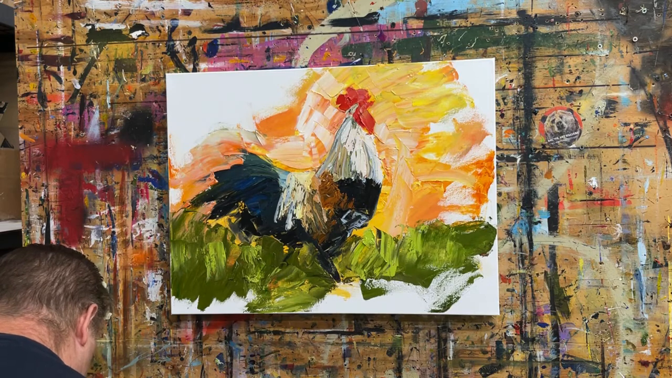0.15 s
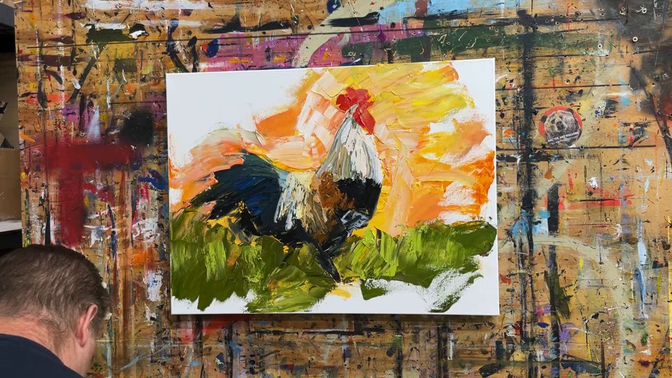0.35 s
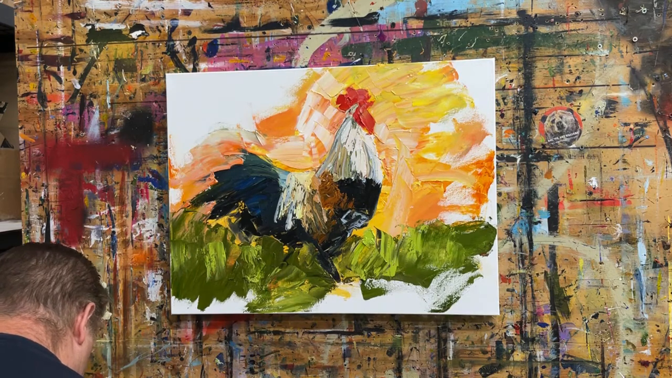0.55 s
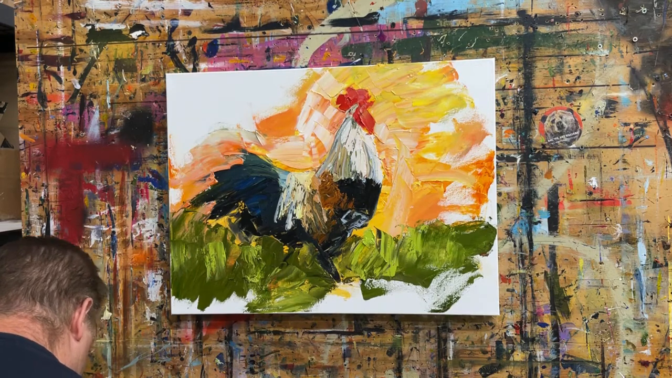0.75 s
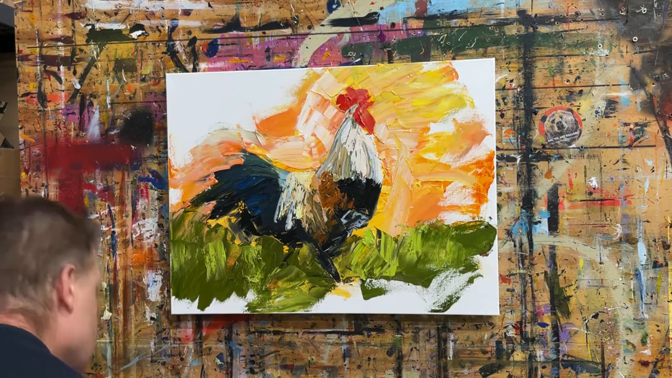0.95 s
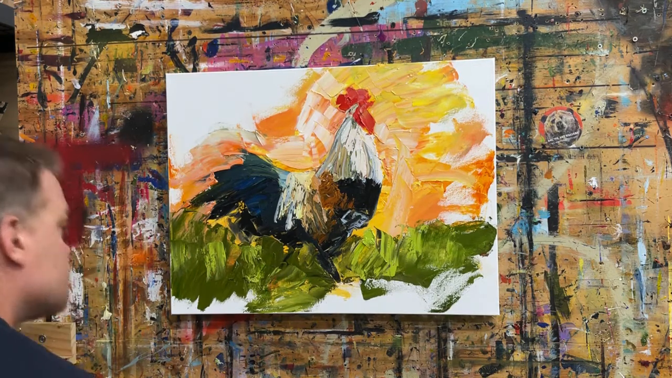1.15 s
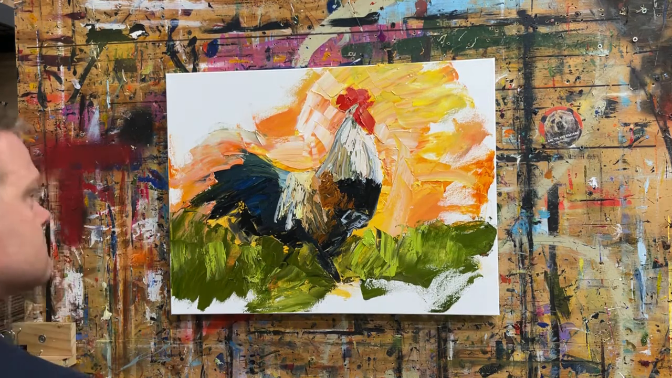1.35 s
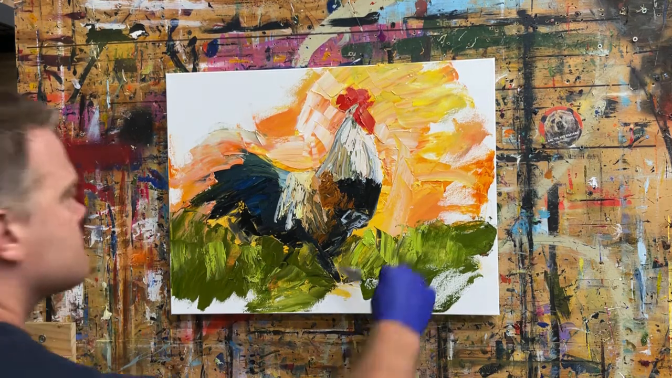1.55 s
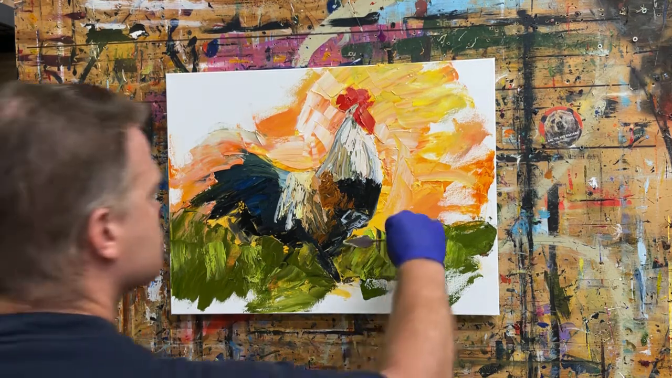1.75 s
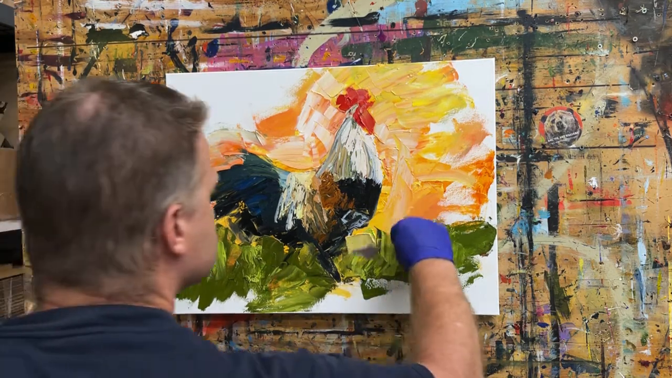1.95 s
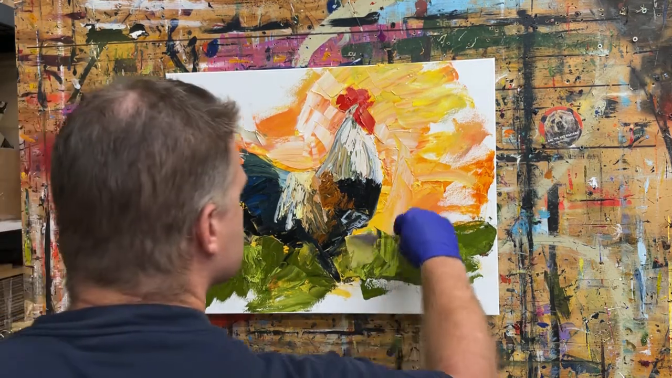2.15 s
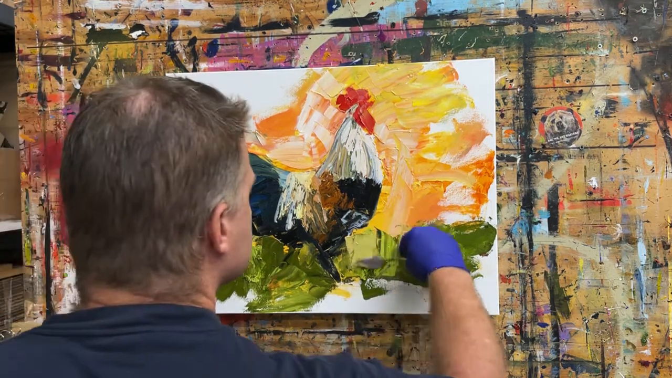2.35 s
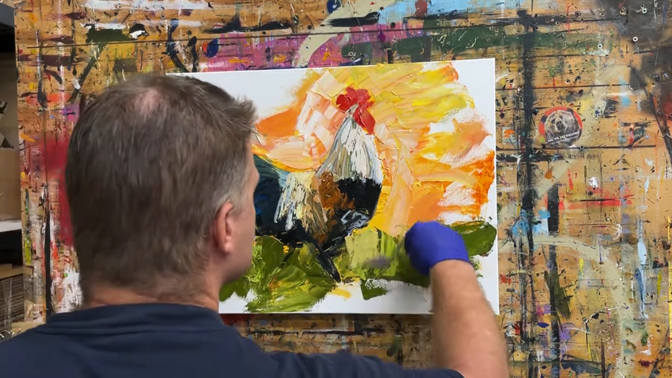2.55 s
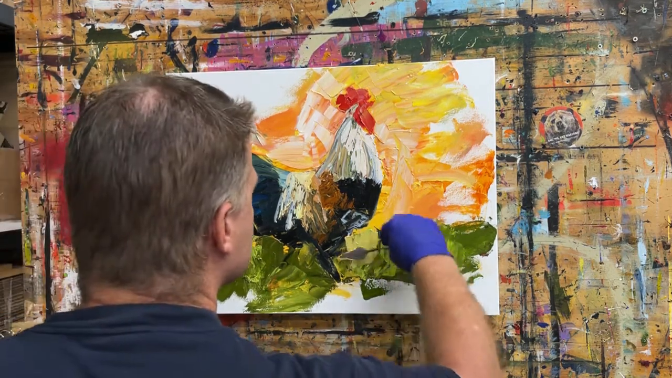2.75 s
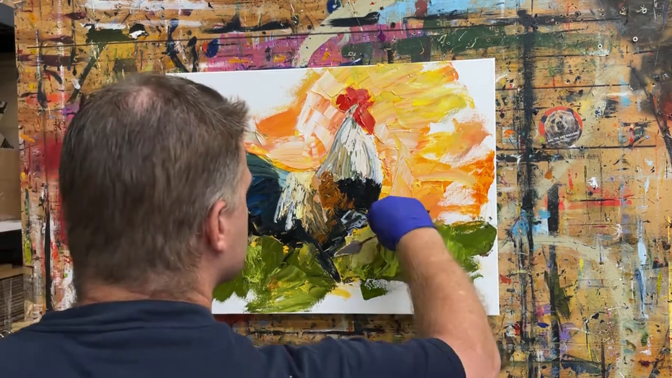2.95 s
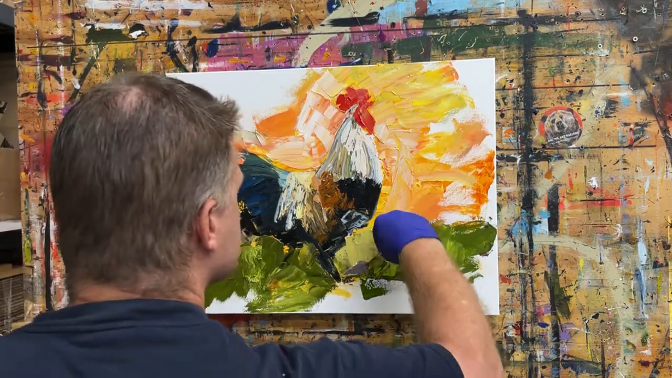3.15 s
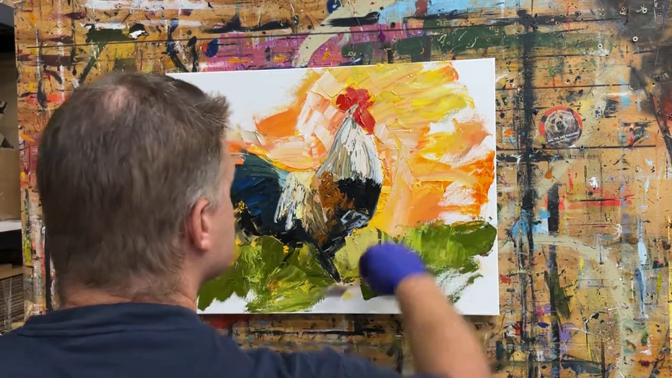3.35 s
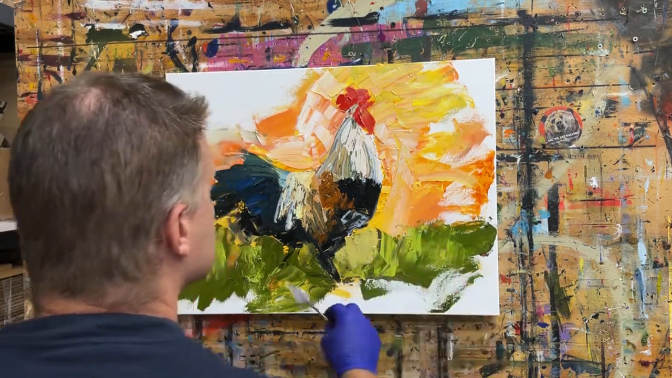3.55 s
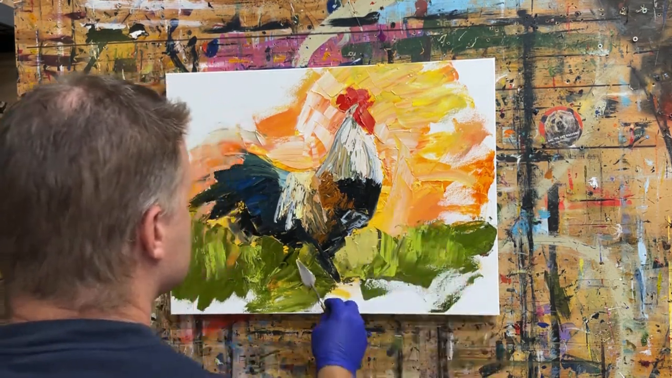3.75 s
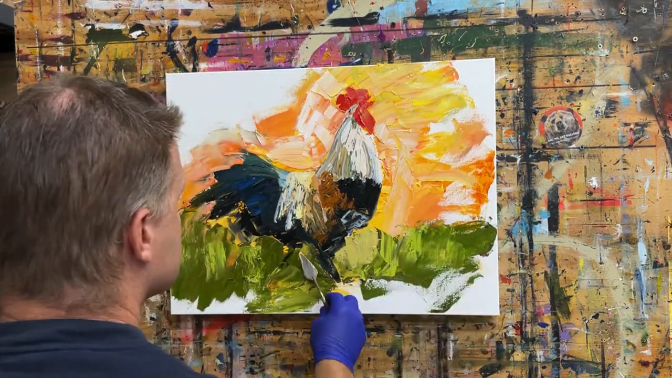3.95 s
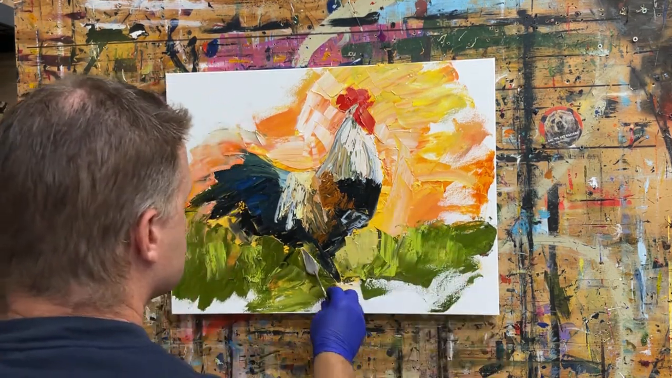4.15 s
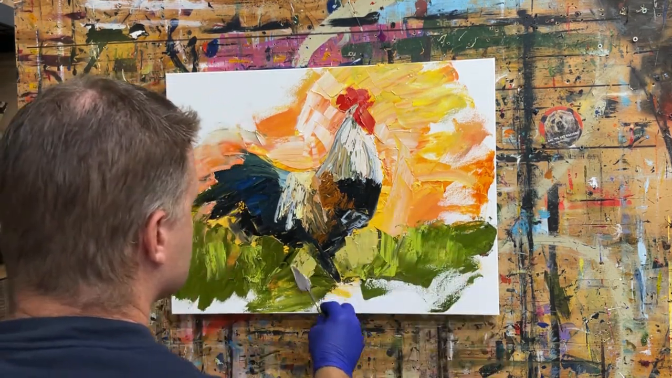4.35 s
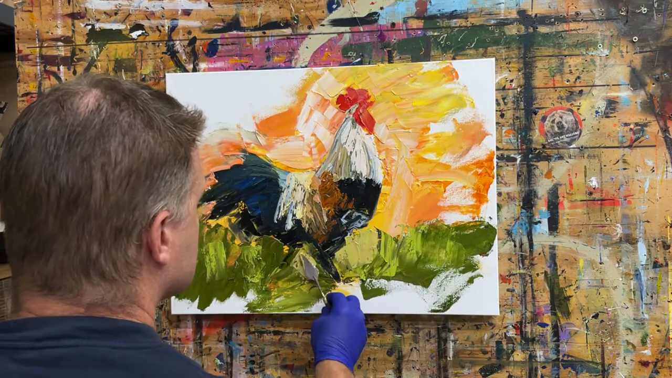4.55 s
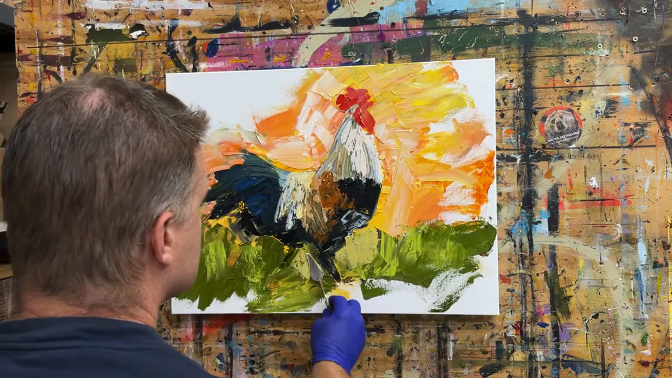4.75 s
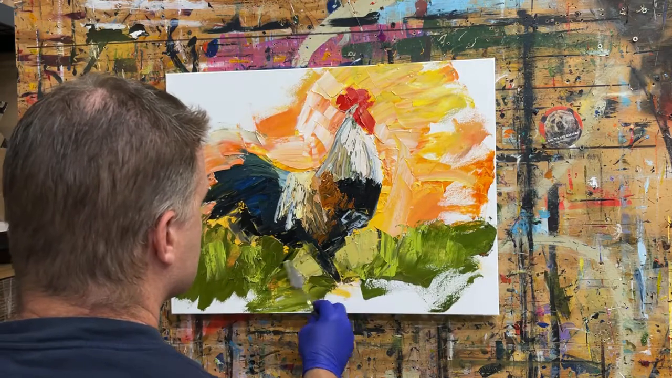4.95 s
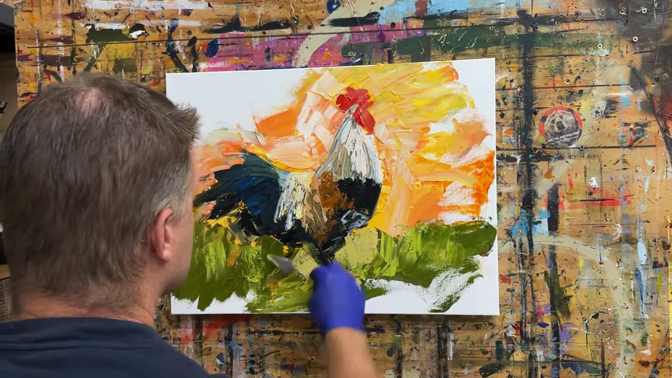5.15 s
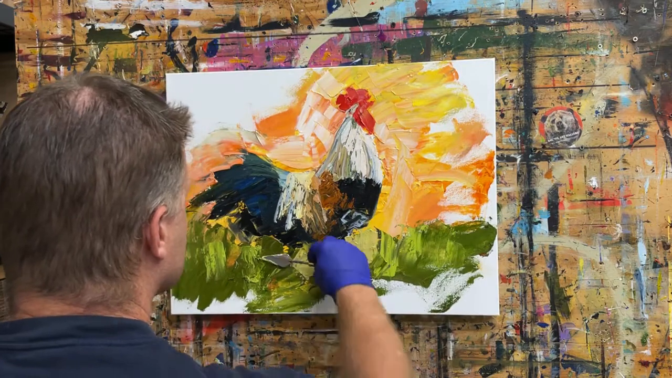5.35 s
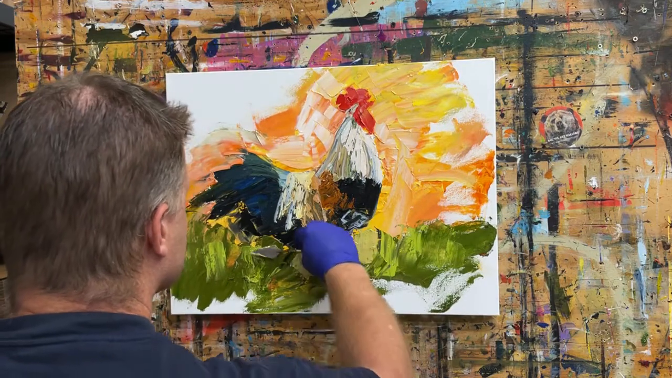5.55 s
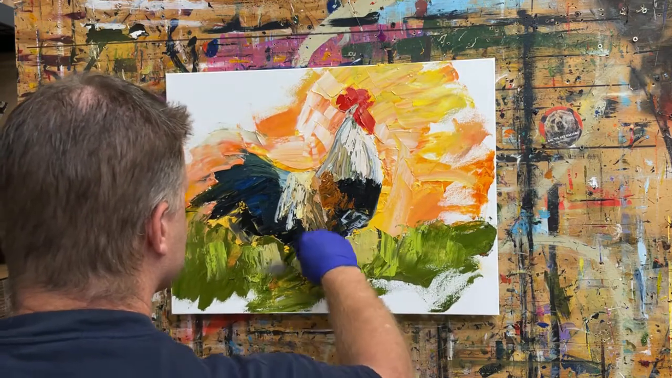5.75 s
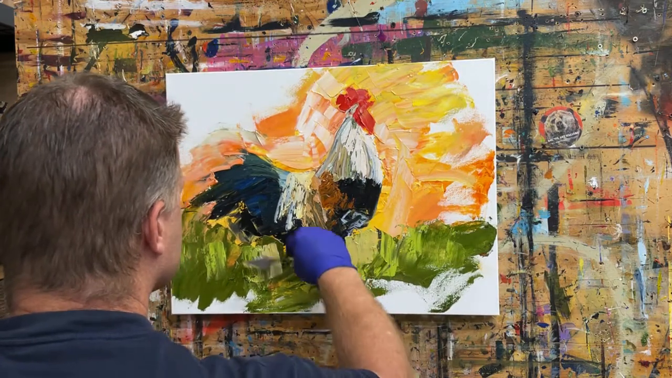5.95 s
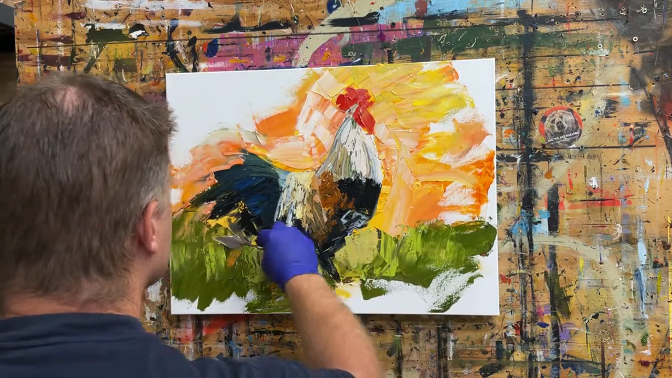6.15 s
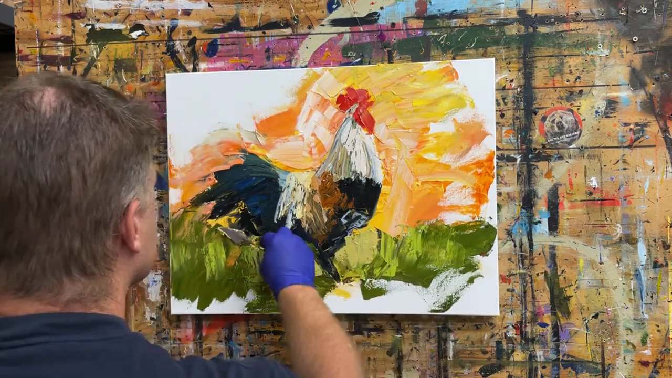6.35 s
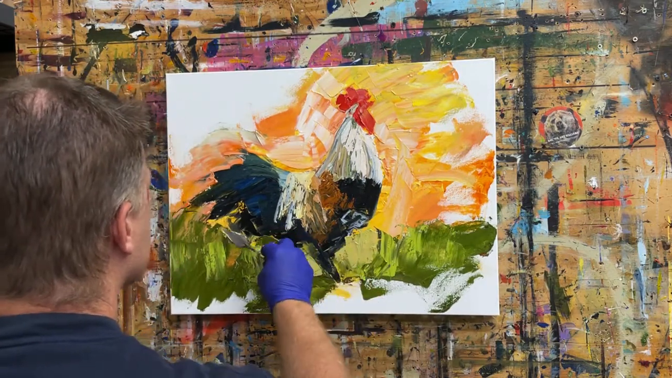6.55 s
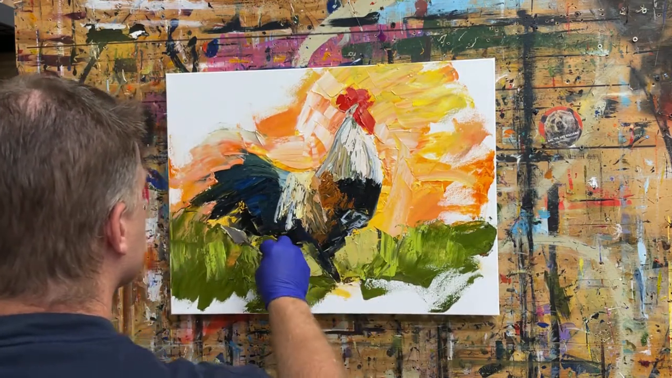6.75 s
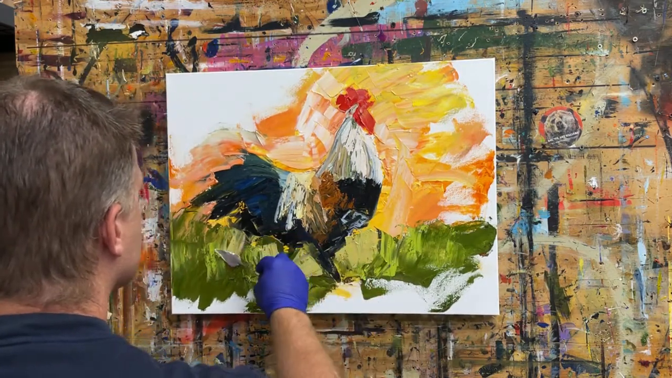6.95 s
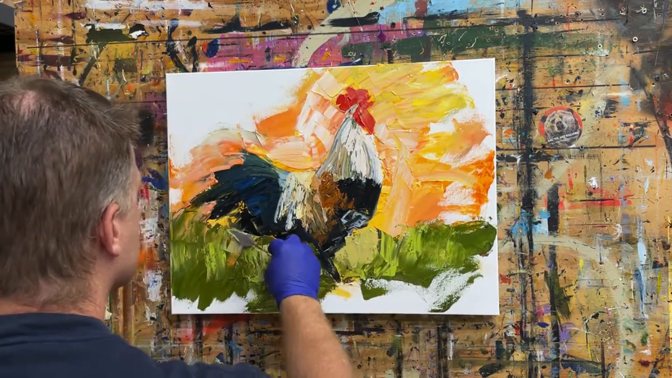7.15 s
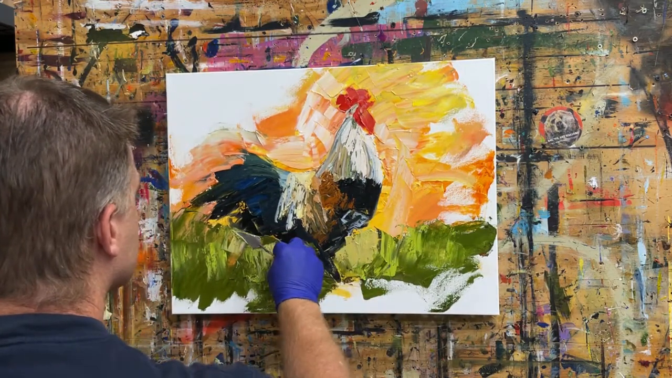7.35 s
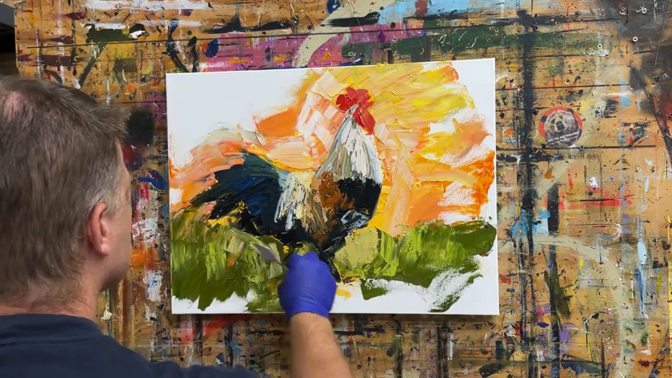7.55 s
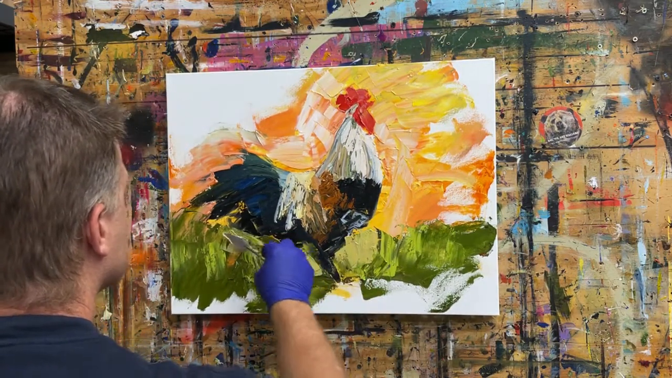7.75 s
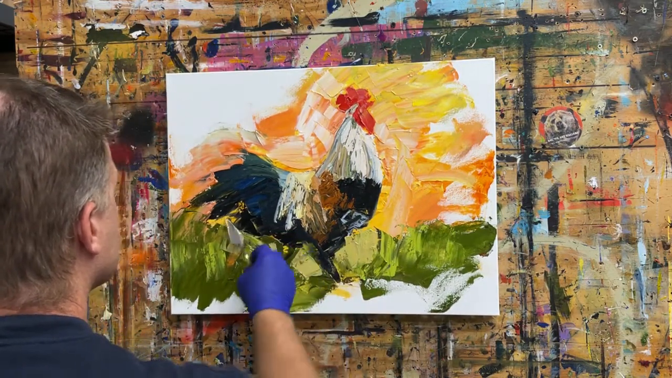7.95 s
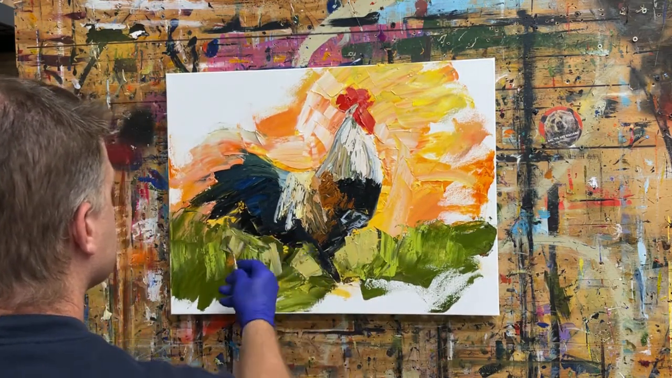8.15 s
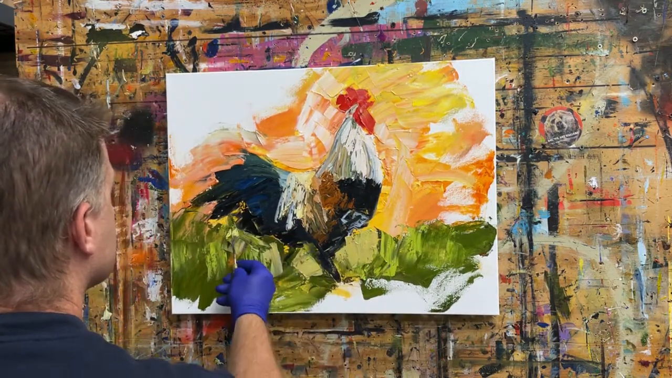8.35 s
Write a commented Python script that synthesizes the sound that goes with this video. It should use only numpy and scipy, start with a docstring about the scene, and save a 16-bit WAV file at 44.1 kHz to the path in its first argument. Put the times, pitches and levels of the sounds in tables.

```python
"""In a small studio, a palette knife dabs thick paint onto a stretched canvas that hangs on a wooden board.
Decaying modes make the taut cloth, the board and the steel blade; short damped pushes make the frame's rocking.
Noise and random grains make cloth flap, squishing paint, slides and soft scuffs, and ticks as the paint lets go.
Wet smacks nearby are crackling films with a popping cavity; below lie ventilation rumble, hum and hiss.
A two-port microphone picks it up, with treble resonances and phase differences between its ports."""
import sys
import numpy as np
from scipy import signal
from scipy.fft import rfft, irfft, next_fast_len
from scipy.io import wavfile
from scipy.ndimage import map_coordinates

SR = 44100
rng = np.random.default_rng(int(sys.argv[2]) if len(sys.argv) > 2 else 0)


def inscribe(sig):
    """Save sig as 16-bit PCM at rate SR to the path in sys.argv[1].

    A 1-D sig is mono; a 2-D sig holds one channel per row.
    Samples are clipped to [-1, 1] before scaling.
    """
    pcm = np.round(np.clip(np.atleast_2d(sig).T, -1, 1) * 32767)
    wavfile.write(sys.argv[1], SR, pcm.astype(np.int16))


N = 369858  # length of the scene in samples

# dabs of the knife: first_touch_s, cloth_ring_db (relative), frame_knock_db (relative), knock_lag_s
DABS = [(1.8819, -31.5, -22, 0.01), (2.2374, -41, -25.5, .01), (2.515, -41.5, -28.5, 0.0096),
        (2.9993, -45, -26, .011), (4.1328, -41.5, -29, .01), (4.739, -42, -24, .011),
        (5.668, -33.5, -29.5, .034), (6.783, -35, -30.5, .045), (7.315, -44.5, -37, 0.035),
        (8.322, -53.5, -39.5, 0.012)]
# modes of the taut cloth under the blade's tip: frequency_hz, level_db, t60_s (before any extra damping)
CLOTH_MODES = [(232.5, -5, .2), (290, 1, 0.15), (371.8, -10, 0.19), (422, -11.5, 0.16), (505, -19.5, 0.1),
               (582, -22, 0.24), (660, -25.5, .15), (783, -25.5, 0.27), (827, -28, .15), (933, -37.5, .18),
               (1058, -30.5, .22)]
FIRM_DB = -24  # the knock of a firm dab, the reference for force


def amp(db):
    """Level law: 20 dB is a factor of ten in amplitude."""
    return 10 ** (np.asarray(db) / 20)


def unit(x):
    """Normalization to an rms of 1."""
    return x / np.sqrt(np.mean(x ** 2) + 1e-20)


def along(points, hz):
    """Logarithmic frequency scale: interpolate (Hz, value) points along it."""
    point_hz, value = np.transpose(points)
    return np.interp(np.log(hz + 1), np.log(point_hz + 1), value)


def filtered(x, response):
    """Linear filtering: multiply the spectrum of x by a complex response of frequency."""
    n = x.shape[-1]
    padded = next_fast_len(n + 8192)  # room for the filter's tail
    hz = np.fft.rfftfreq(padded, 1 / SR)
    return irfft(rfft(x, padded) * response(hz), padded)[..., :n]


def noise(spectrum, shape):
    """Spectral shaping of white noise, to an rms of 1."""
    white = rng.standard_normal(shape)
    return unit(filtered(white, lambda hz: amp(along(spectrum, hz))))


def spread(pair):
    """Diffuse field: mix two unrelated signals to a set coherence between the two ports."""
    # likeness of left and right: frequency_hz, correlation [1 = alike]
    likeness = [(60, 1), (250, 0.81), (500, .25), (1000, 0.12), (6500, 0.45), (8500, 1), (12000, .85),
                (14000, .2)]

    def mid_and_side(hz):
        angle = np.arccos(np.clip(along(likeness, hz), -1, 1)) / 2
        return np.array([np.cos(angle), np.sin(angle)])

    mid, side = filtered(pair, mid_and_side)
    return np.array([mid + side, mid - side])


def add(track, s, sound):
    """Superposition: mix a sound into the track at time s."""
    part = track[max(round(s * SR), 0):][:len(sound)]
    part += sound[:len(part)]


def room_tone():
    """Stationary background: diffuse ventilation rumble and faint hiss, with harmonics of mains hum."""
    # ventilation rumble: frequency_hz, density_db (per Hz, relative)
    rumble_colour = [(12, -18.5), (26, -9.5), (38, -8), (55, -0.5), (100, -0.5), (150, -8), (240, -11),
                     (310, -18.5), (480, -28.5), (630, -34), (790, -40.5), (1000, -47.5), (1500, -60.5),
                     (3000, -78.5)]
    # faint hiss: frequency_hz, density_db (per Hz, relative)
    hiss_colour = [(300, -22), (900, 8.5), (2000, 5), (4000, -1), (7000, -2), (11000, -4), (15000, 2)]
    # hum lines of the ventilation: mains_multiple, level_db (rms)
    hum_lines = [(1, -63), (8, -84.5), (12, -93.5)]
    rumble_db, hiss_db, mains_hz = -54, -87.5, 60
    t = np.arange(N) / SR
    hum = np.zeros(N)
    for multiple, db in hum_lines:
        hum += amp(db) * np.sqrt(2) * np.sin(2 * np.pi * round(multiple) * mains_hz * t)
    rumble = amp(rumble_db) * noise(rumble_colour, (2, N))
    hiss = amp(hiss_db) * noise(hiss_colour, (2, N))
    return spread(rumble + hiss) + hum


def crackle(spectrum, rate):
    """Shot noise: a quarter second of tiny bursting films, rate a second on average, rms 1."""
    n = SR // 4
    bursts = rng.random(n) < rate / SR
    grains = bursts * rng.choice([-1, 1], n) * rng.uniform(0.29, 1, n)
    return unit(filtered(grains, lambda hz: amp(along(spectrum, hz))))


def burst(length):
    """Impulsive envelope: a snap that peaks at half its length; longer ones swell more gently."""
    u = 2 * np.arange(SR // 4) / SR / length
    return u * np.exp(1 - u)


def cavity(hz):
    """Cavity resonance: the colour of a small wet pocket that rings at hz, as (Hz, dB per Hz)."""
    # a small wet pocket: pitch_multiple, density_db (per Hz, relative)
    pocket = [(.2, -15), (.5, -5.5), (1, 0), (1.63, -9), (5, -19), (12, -37)]
    return [(hz * multiple, db) for multiple, db in pocket]


def uneven():
    """Chance resonances: a response with random peaks and dips over frequency."""
    depth_db, spacing_hz = 2, 261.7
    knots = rng.standard_normal(SR // 200)
    return lambda hz: amp(depth_db * map_coordinates(knots, [hz / spacing_hz], mode="mirror"))


def smacks():
    """Film rupture: a wet film breaks in a bright snap and pops its cavity; the room scatters it into a hush."""
    # quick wet smacks: start_s, snap_db (relative), pop_db (relative), pop_hz
    quick_events = [(0.036, -69, -101, 1500), (.44, -46, -69.5, 1810), (.665, -77, -71, 1180),
                    (0.796, -77, -79, 1490), (0.946, -53.5, -63, 2620), (3.569, -52, -64, 3660),
                    (7.552, -47.5, -66, 2040), (7.559, -44, -46, 610)]
    # slower wet squelches: start_s, level_db (relative), length_s, cavity_hz
    slow_events = [(.718, -68.5, 0.025, 620), (.888, -65, 0.026, 1900)]
    # colour of a breaking film: frequency_hz, density_db (per Hz, relative)
    film_colour = [(200, -29), (800, -44), (2500, -6.5), (5500, -5), (8500, 4), (11200, 5.5), (13000, 3),
                   (15500, 5.5)]
    smack_s = 0.0033  # every quick film breaks about this fast
    fizz_db = -24  # the crackle of a squelch under its cavity
    films = 25  # tiny films that burst in one pop: their rate is this over the length
    swell_s, swell_db = 0.014, -28.5  # time constant of the hiss before a smack; level re the snap

    direct, scattered = np.zeros(N), np.zeros((2, N))
    t = np.arange(SR // 4) / SR
    fade = (1 - np.exp(-t / 0.003)) * np.exp(-np.log(1000) * t / 0.21)  # t60 0.21 s
    quick = [(s, snap_db, pop_db, hz, smack_s) for s, snap_db, pop_db, hz in quick_events]
    slow = [(s, db + fizz_db, db, hz, length) for s, db, length, hz in slow_events]
    for s, snap_db, pop_db, hz, length in quick + slow:
        resonances = uneven()
        snap = amp(snap_db - 3) * crackle(film_colour, rate=13000)
        pop = amp(pop_db - 0.5) * crackle(cavity(hz), rate=films / length)
        add(direct, s, burst(length) * filtered(snap + pop, resonances))
        # a faint hiss swells just before each smack
        swell = np.exp((t - t[-1]) / swell_s) * crackle(film_colour, rate=2700)
        add(direct, s - t[-1], amp(snap_db + swell_db) * swell)
        for port in scattered:  # a longer snap puts more energy into the room
            snap_hush = amp(snap_db + 10.5) * noise(film_colour, len(t))
            pop_hush = amp(pop_db + 18.5) * noise(cavity(hz), len(t))
            add(port, s, np.sqrt(length) * fade * filtered(snap_hush + pop_hush, resonances))
    return direct + spread(scattered)


def ring(modes, rise, scatter_db, damping=1):
    """Modal superposition: one second of decaying modes, a little different for each blow."""
    t = np.arange(SR) / SR
    hz, db, t60 = np.transpose(modes)[:, :, None]
    level = db + scatter_db * rng.standard_normal(hz.shape)
    sign = (-1) ** np.arange(len(hz))[:, None]  # neighbouring modes swing in opposite directions
    decay = np.exp(-np.log(1000) * damping * t / t60)
    waves = sign * amp(level) * decay * np.sin(2 * np.pi * hz * t)
    return waves.sum(0) * (1 - np.exp(-t / rise))


def squeeze(length, rise):
    """Pressure envelope: a press is quick to build, held for its length, then let go."""
    t = np.arange(SR // 4) / SR
    return (1 - np.exp(-t / rise)) * np.exp(-(t / length) ** 3)


def dabs():
    """Impact excitation: the blade rings the cloth; the frame knocks on the board and rocks to rest."""
    # board and frame pressed together: frequency_hz, level_db, t60_s
    board_modes = [(59.6, -22, 0.86), (76.9, -18.5, .55), (109, -32.5, 0.09), (129, -27.5, 0.22),
                   (144, -25, 0.13), (180.3, -24.5, 0.55), (237.7, -15.5, .32), (373.9, -18, 0.28),
                   (415.5, -14, 0.13), (507, -27, .26), (550, -30, .24), (654, -38, .2), (813, -50.5, .22)]
    # the frame rocks from corner to corner: delay_s (from the knock; a negative one comes before it),
    # frequency_hz, half_length_s, level_db
    contacts = [(0, 147.3, 0.0052, 0), (-.0072, 352, .0045, -12.5), (.0135, 395, 0.0046, -12),
                (.0255, 196, .003, -10.5), (.0375, 150, 0.003, -7)]
    # the crowd of short-lived cloth modes: frequency_hz, density_db (per Hz, relative)
    flap_colour = [(150, -12.5), (280, 5), (440, -0.5), (620, -6.5), (800, -23.5), (1100, -28.5),
                   (1400, -53.5), (2500, -56)]
    flap_db, flap_grows = -39, 1.55  # cloth flap in a firm dab; its dB per dB of knock

    out = np.zeros(N)
    lead = 1 / 20  # seconds from the start of a push to its middle
    t = np.arange(2 * round(lead * SR)) / SR - lead
    for s, ring_db, knock_db, lag in DABS:
        force_db = knock_db - FIRM_DB
        add(out, s, amp(ring_db - 4.0) * ring(CLOTH_MODES, rise=0.0025, scatter_db=2))
        flap = squeeze(0.037, rise=0.00093) * noise(flap_colour, SR // 4)
        add(out, s - .001, amp(flap_db + flap_grows * force_db) * flap)
        add(out, s + lag, amp(knock_db) * ring(board_modes, rise=0.013, scatter_db=3.0))
        for delay, hz, length, db in contacts:  # each soft contact is one short, heavily damped push
            push = -np.cos(2 * np.pi * hz * t) * np.exp(-(t / length) ** 2)
            hardness_db = 0.22 * force_db * np.log2(hz / 150)  # harder knocks are brighter
            level_db = knock_db + db + hardness_db + rng.normal(0, 0.66)
            add(out, s + lag + delay - lead, amp(level_db) * push)
    return out


def paint():
    """Viscous flow, friction and adhesion: paint squishes, blade or cloth scuffs, and peeling paint snaps."""
    # squishing paint: frequency_hz, density_db (per Hz, relative)
    squish_colour = [(100, -44), (500, 11), (1000, -1), (1500, -3), (2900, -14), (4000, -19.5), (5400, -25),
                     (6000, -17), (6600, -31), (7700, -20), (12000, -20), (15000, -40)]
    # slides and soft scuffs of blade or cloth: middle_s, paint_db, half_length_s, cloth_db
    scuffs = [(1.944, -74, .007, -64), (2.549, -63.5, .005, -66), (3.095, -65, 0.022, -61),
              (5.745, -66, 0.019, -59), (6.838, -70, .018, -55), (8.224, -87, 0.031, -62)]
    # the rasp of a slide or scuff: frequency_hz, density_db (per Hz, relative)
    scuff_colour = [(150, -25.5), (500, 11), (1900, 0.5), (3000, -2), (4500, -12), (6500, -16), (8500, -10),
                    (12000, -14.5), (16000, -16)]
    # the cloth springing back: frequency_hz, density_db (per Hz, relative)
    spring_colour = [(200, -23), (350, 6.5), (620, -0.5), (900, -20.5), (1600, -45)]
    # the blade peels off: start_s, tick_db (relative), brightness_db_per_octave, cloth_db (relative)
    releases = [(2.026, -55.5, -2, -46.5), (4.327, -56.5, 7, -47), (5.833, -52.5, 7, -41.5),
                (6.956, -60, -8.5, -44.5)]
    # the tick before its brightness tilt: frequency_hz, density_db (per Hz, relative)
    tick_colour = [(150, -22), (500, -0.5), (1900, 2), (3000, -7.5), (4500, -16.5), (8000, -11),
                   (12000, -11), (16000, -13.5)]
    squish_db, squish_grows = -68.5, 0.4  # squish in a firm dab; its dB per dB of knock
    press_s, press_grows = 0.18, .4  # press length if the cloth rang as loud as a firm knock; dB per dB of ring
    tick_s, tick_shortens = 0.0063, 0.026  # plain tick; share lost per dB per octave of brightness

    out = np.zeros(N)
    for s, ring_db, knock_db, _ in DABS:  # a harder dab squishes louder, a deeper one longer
        level_db = squish_db + squish_grows * (knock_db - FIRM_DB)
        length = press_s * amp(press_grows * (ring_db - FIRM_DB))
        squish = squeeze(length, rise=0.0014) * crackle(squish_colour, rate=3100)
        add(out, s - .003, amp(level_db) * squish)
    t = np.arange(SR // 4) / SR - 1 / 8
    for s, db, length, cloth_db in scuffs:  # each swells and fades evenly
        rasp = amp(db) * crackle(scuff_colour, rate=3000)
        cloth = amp(cloth_db) * noise(spring_colour, len(t))
        add(out, s + t[0], np.exp(-(t / length) ** 2) * (rasp + cloth))
    for s, db, bright_db, cloth_db in releases:  # thin paint snaps brighter and quicker than thick
        colour = [(hz, level + bright_db * np.log2(hz)) for hz, level in tick_colour]
        length = tick_s * np.exp(-tick_shortens * bright_db)
        add(out, s, amp(db - 5.5) * burst(length) * crackle(colour, rate=3500))
        add(out, s, amp(cloth_db - 6.5) * burst(length + 0.0031) * noise(spring_colour, SR // 4))
        cloth_ring = ring(CLOTH_MODES, rise=0.00044, scatter_db=2.0, damping=1.2)
        add(out, s, amp(cloth_db - 10.5) * cloth_ring)
    return out


def blade(x):
    """Driven resonance: the paint noise x excites the faint ring of the steel."""
    # the steel blade, damped by paint: frequency_hz, level_db, t60_s
    steel_modes = [(3080, -8, .04), (4130, -3, 0.056), (6040, -1, 0.11), (7780, 1.5, 0.098)]
    steel = ring(steel_modes, rise=.0002, scatter_db=5.5)
    driven = signal.fftconvolve(x, steel)[:N]
    return amp(-25.5) * np.std(x) * unit(driven)  # level re the paint noise


def studio(x, gap):
    """Reverberation: the walls answer after a short gap; the treble dies first."""
    # decay of the room: frequency_hz, t60_s
    decay_times = [(60, 0.48), (160, 0.3), (420, 0.27), (1100, 0.35), (3000, 0.25), (8000, 0.16),
                   (15000, 0.18)]
    hz, t, z = signal.stft(rng.standard_normal((2, SR)), SR, nperseg=256)
    decay = np.exp(-np.log(1000) * t / along(decay_times, hz)[:, None])
    tail = signal.istft(z * decay, SR, nperseg=256)[1]
    # silent for half the gap, full at one and a half gaps
    onset = np.clip(np.arange(tail.shape[1]) / SR / gap - .5, 0, 1)
    tail = spread(tail) * onset
    return signal.fftconvolve(x[None], tail / np.linalg.norm(tail[0]), axes=1)[:, :N]


def scene():
    """Direct and reverberant sound: the canvas has a studio answer; the smacks are closer and drier."""
    thumps, wet = dabs(), paint()
    wet = wet + blade(wet)
    answer = amp(-10.0) * studio(thumps, gap=0.014) + amp(-10.0) * studio(wet, gap=0.006)
    return thumps + wet + answer + smacks() + room_tone()


def record(dry):
    """Port resonance: two ports boost the treble, differ in level and phase, and stop at a band limit."""
    # resonance of the ports: frequency_hz, gain_db
    port_gain = [(6000, 1.5), (8000, 4.5), (9200, 7.5), (11300, 10), (13000, -9), (16000, -17.5)]
    # left over right: frequency_hz, difference_db
    port_tilt = [(330, 0.5), (500, 2), (4000, 4), (7000, 4.5), (8500, -0.5)]
    # phase by which left leads: frequency_hz, lead_rad
    port_lead = [(1000, 0), (3000, .8), (6000, .5), (7500, 1.3), (8500, 0), (10250, -3.14), (12700, -7),
                 (13450, -9.42), (15200, -12.57)]
    top_hz = 16200
    sides = np.array([[.5], [-.5]])  # left and right each take half the difference

    def ports(hz):
        gain = amp(along(port_gain, hz) + sides * along(port_tilt, hz))
        phase = np.exp(1j * sides * along(port_lead, hz))
        return gain * phase * (hz < top_hz)

    return filtered(dry, ports)


dry = scene()
out = record(dry)
inscribe(out)
```